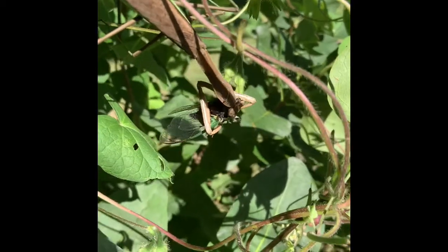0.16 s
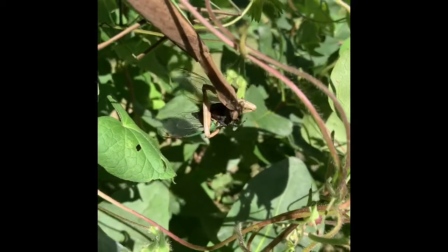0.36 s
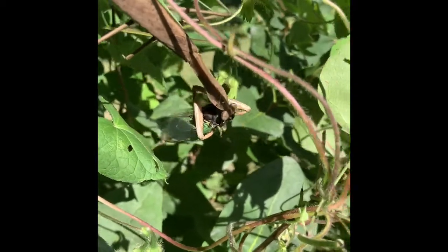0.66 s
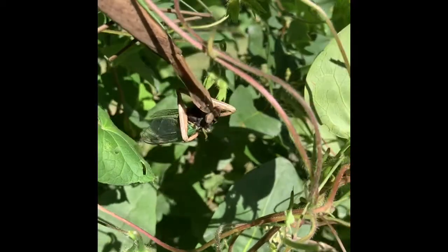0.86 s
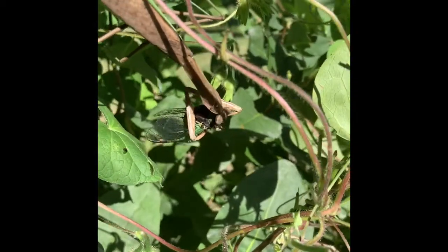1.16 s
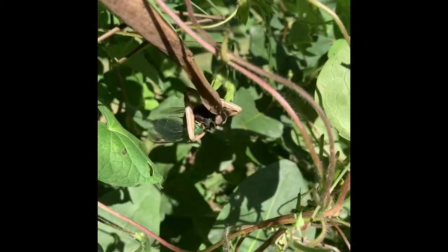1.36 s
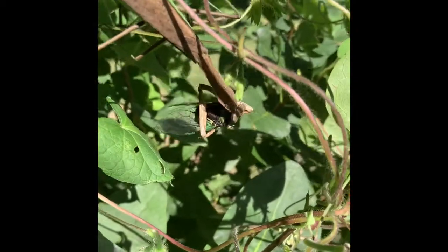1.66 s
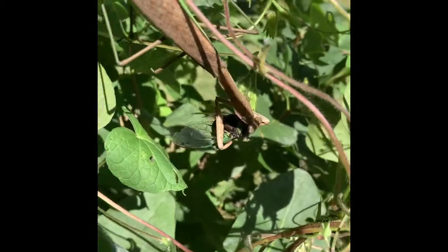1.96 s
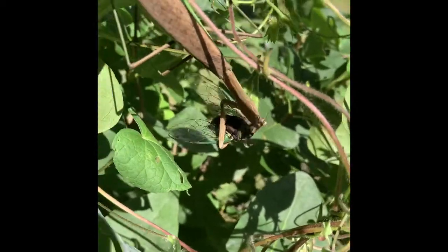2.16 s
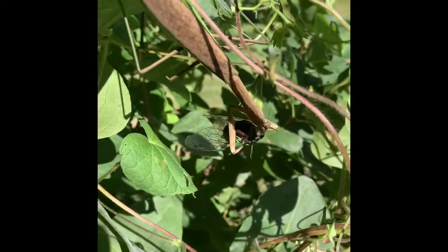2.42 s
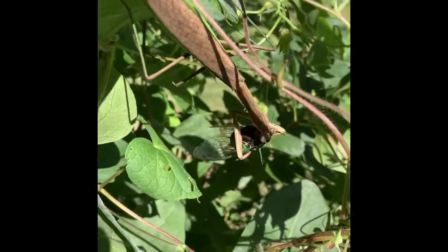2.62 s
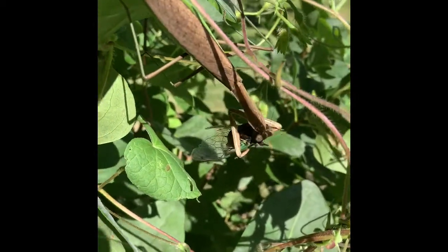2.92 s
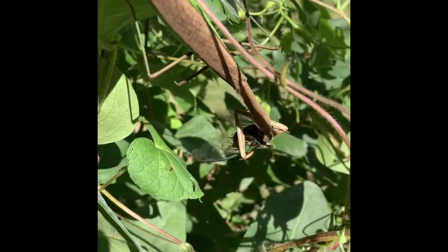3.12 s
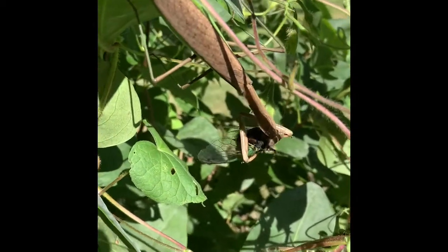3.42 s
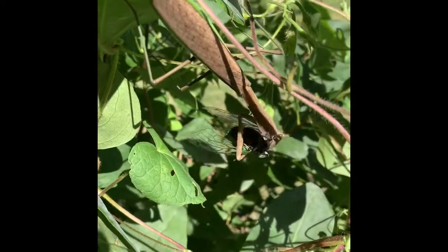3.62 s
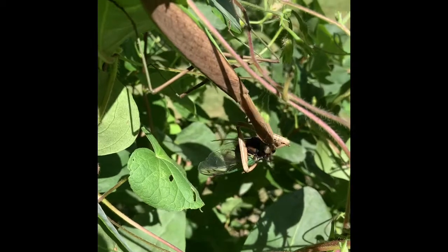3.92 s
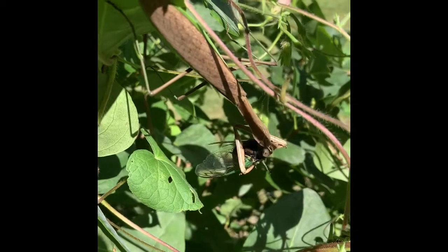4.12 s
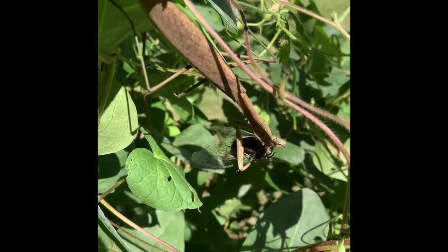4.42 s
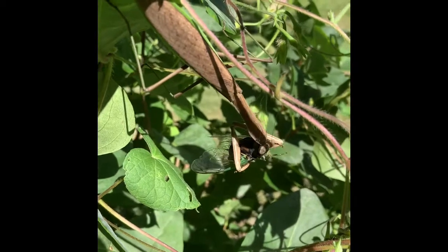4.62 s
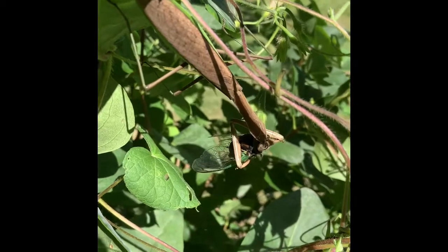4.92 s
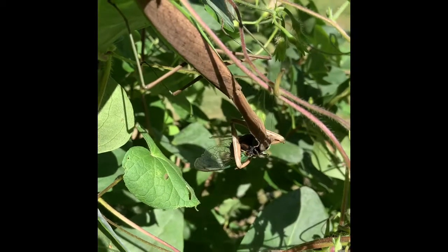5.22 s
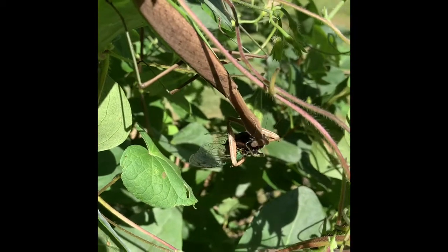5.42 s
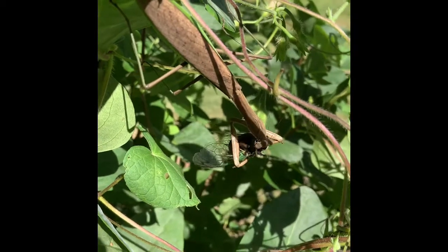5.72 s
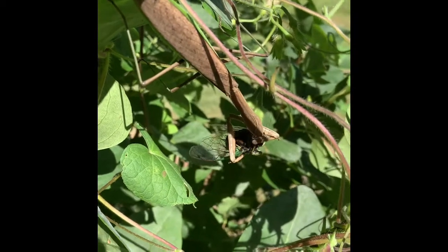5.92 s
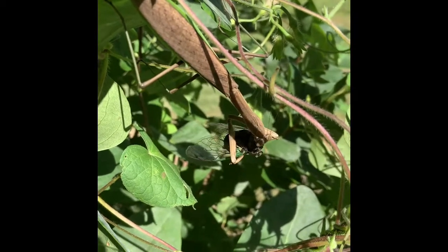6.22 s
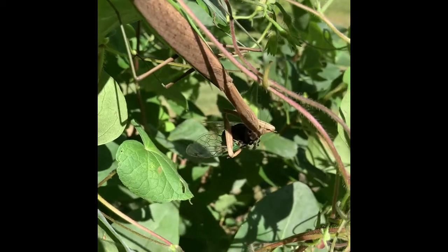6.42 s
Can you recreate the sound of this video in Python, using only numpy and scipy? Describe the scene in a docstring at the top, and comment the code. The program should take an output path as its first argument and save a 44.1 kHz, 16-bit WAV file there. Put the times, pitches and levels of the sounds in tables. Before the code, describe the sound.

Brittle wing flutters rattle among leaves in irregular groups, while far cicadas hiss, a cricket chirps rapidly and low traffic hums far away.

```python
"""A cicada held among vine leaves flaps its wings in short dry bursts close to a pair of microphones:
enveloped, crackling noise drives membrane resonances, with a soft leafy wash and a dull thud.
Around it, a far cicada chorus is a steady high hiss of noise bands, one cricket chirps a nearly pure
tone, and a katydid buzzes in long phrases of filtered ticks and rasp. Distant traffic hums in wavering
tones and rumbles in noise bands, with the coloured noise of leaves and open air."""
import sys
import numpy as np
from scipy import signal
from scipy.fft import rfft, irfft
from scipy.io import wavfile
from scipy.ndimage import uniform_filter1d

SR = 44100
rng = np.random.default_rng(int(sys.argv[2]) if len(sys.argv) > 2 else 0)


def wrap_up_sound(samples):
    """Save the sound to the file named by the first command line argument, as 16-bit audio."""
    columns = np.atleast_2d(samples).T
    # keep every value between -1 and 1, then stretch to whole-number steps
    tamed = np.clip(columns, -1, 1)
    steps = np.round(tamed * 32767).astype(np.int16)
    wavfile.write(sys.argv[1], SR, steps)


N = 289737
TIME = np.arange(N) / SR   # s
HZ = np.maximum(np.arange(N // 2 + 1) * SR / N, 1)   # frequency of each bin

# Traffic: lower and higher engine hum: t/s, lower level/dB, higher level/dB
HUM_LEVELS = [(0.0, -41.5, -65), (0.05, -41, -50), (0.16, -30, -63), (0.27, -40.5, -61), (0.4, -33, -43),
              (0.84, -40.5, -43), (0.86, -34.5, -43), (1.24, -40, -58), (1.41, -39.5, -40.5),
              (1.55, -49, -52), (2.05, -40, -38.5), (2.14, -51, -52), (2.42, -39.5, -37.5),
              (2.58, -48.5, -50.5), (2.95, -70, -34), (3.24, -60, -37.5), (3.48, -53, -52.5),
              (3.57, -66, -41.5), (4.1, -53, -49.5), (4.34, -44, -48.5), (4.48, -66, -56),
              (4.78, -50.5, -59), (5.09, -57, -51.5), (5.16, -42, -52), (5.21, -47, -68),
              (5.43, -53, -48.5), (5.84, -49, -63), (5.93, -61.5, -52), (6.4, -45, -54), (6.57, -50, -46.5)]
# Pitch of the lower hum: t/s, f/Hz
LOW_HUM_PITCH = [(0, 87.18), (1.3, 84.94), (2.5, 80.63), (4.3, 85.53), (5.7, 81.3), (6.57, 83.9)]
# Pitch of the higher hum: t/s, f/Hz
HIGH_HUM_PITCH = [(0, 98), (2.4, 96.3), (2.8, 100.5), (3.601, 102), (6.57, 103.6)]
# Harmonics of the lower hum: order, relative level/dB
LOW_HUM_HARMONICS = [(1, 0), (2, -19)]
HUM_WAVER_DB, HUM_WAVER_HZ = 1.04, 8.7
# A third, thin engine tone that comes and goes: t/s, f/Hz, level/dB
THIN_HUM_COURSE = [(3.4, 168, -70), (3.64, 167, -59), (4.13, 169, -60), (4.3, 169, -68), (5.2, 170, -65),
                   (5.5, 171, -55.5), (6.0, 171, -59.5), (6.57, 172, -57)]
# Rumble and the drone above it: t/s, rumble relative level/dB, drone relative level/dB
RUMBLE_LEVELS = [(0.0, -47, -56), (0.33, -44.5, -59), (0.8, -50, -51), (0.88, -51.5, -60.5),
                 (1.85, -53, -60.5), (2.01, -44, -53), (2.34, -46, -56.5), (2.47, -50, -57.5),
                 (4.55, -54, -66), (5.78, -52.5, -67.5), (6.37, -54.5, -61.5), (6.44, -50.5, -68.5),
                 (6.57, -56, -62)]
# Spectrum of the rumble: f/Hz, relative level/dB
RUMBLE_SPECTRUM = [(25, -19), (45, -7), (65, 6), (110, 3), (140, -1.5), (170, -5), (230, -10), (300, -22),
                   (500, -22.5), (1000, -58.5)]
# Wavering tones within the rumble: f/Hz, relative level/dB
RUMBLE_STRANDS = [(140, -6), (222, -16.5)]
DRONE_HZ, DRONE_WIDTH_HZ = 384.2, 100
# A falling tone in the drone: t/s, f/Hz
WHINE_PITCH = [(0, 362), (2.3, 342.7)]
# Middle bands: t/s, relative level/dB near 240 Hz, relative level/dB near 550 Hz
ROAR_LEVELS = [(0.0, -54.5, -76), (0.69, -67, -67), (1.1, -74, -67), (1.5, -56.5, -65), (1.88, -61, -79),
               (2.21, -56, -63), (2.78, -57, -65), (2.98, -58, -60.5), (5.84, -62, -67), (6.57, -68, -63)]

# Spectrum of the open air: f/Hz, relative level/dB
AIR_SPECTRUM = [(600, 6.5), (1000, 4), (2000, -5.5), (3500, -9.5), (8500, -13.5), (10000, -60),
                (13000, -47), (15700, -24), (15950, -48)]
AIR_START_DB, AIR_FALL_DB_PER_S = -62.5, 0.19   # the far noise recedes

# Far cicada chorus: t/s, level/dB
CHORUS_LEVELS = [(0.0, -56.5), (2.78, -59), (5.76, -60.5), (6.57, -61)]
# Noise bands of the chorus: f/Hz, width/Hz, relative level/dB
CHORUS_BANDS = [(5395, 1060, 2.5), (6854, 810, 8), (7656, 456, 2)]

CRICKET_START_S, CRICKET_PERIOD_S, CRICKET_HZ = .025, .10357, 8045
# Loudness of the cricket as it turns: t/s, relative level/dB
CRICKET_LEVELS = [(0, -62), (2.0, -62.5), (2.8, -63), (3.4, -67), (4.2, -66), (5.1, -66), (5.8, -62.5),
                  (6.57, -57.5)]

# Katydid phrases: start t/s, end t/s, stroke rate f/Hz at the start, stroke rate f/Hz at the end
KATYDID_PHRASES = [(.0667, 1.915, 65.13, 60.93), (3.2002, 4.79, 63.93, 60.56), (5.8915, 6.57, 65.54, 62.2)]
KATYDID_TICK_DB = -60   # impulse level ahead of the resonances
KATYDID_RISE_S, KATYDID_RISE_DB = .06, 13
# Soft single strokes outside the steady buzz: t/s, relative level/dB, half length/ms
KATYDID_SINGLES = [(2.486, -73, 2.5), (2.5, -65, 6), (5.307, -76, 2.25), (5.32, -65, 5), (5.897, -72, 2.5),
                   (5.912, -68, 6)]
# The two teeth struck first: delay t/ms, f/Hz, width/Hz, relative level/dB
KATYDID_TEETH = [(0, 14750, 1500, 3), (1.0, 15250, 1100, 0)]
TICK_SPREAD_DB = 4
# Wing resonances of the rasp: f/Hz, width/Hz, relative level/dB
KATYDID_RESONANCES = [(11400, 830, -10), (13850, 600, -3), (14650, 600, 3), (15150, 600, 3),
                      (15650, 350, 5)]
KATYDID_TOP_HZ = 15850

# Wing beats, mostly a slap and a back stroke, and a few faint leaf ticks: slap t/s,
# slap peak relative level/dB, dull part level/dB re the slap, back stroke delay t/ms,
# back stroke peak relative level/dB
WING_BEATS = [(0.263, -34, -10, 24, -32), (0.301, -21, -14.5, 26, -53), (0.3435, -17.5, -17, 32, -28.5),
              (0.621, -34.5, -11, 28.7, -20.5), (0.6643, -20.5, -16, 28.5, -32), (0.707, -19, -17, 34, -33),
              (0.7533, -25, -12.5, 33, -41), (1.2403, -23.5, -14.5, 22.6, -32), (1.2776, -20, -16, 26, -32),
              (1.321, -20, -18, 36, -39), (1.58, -29, -22, 27.4, -29), (1.619, -21, -13.5, 30, -29),
              (1.6634, -20.5, -16, 34, -35), (1.71, -26, -16, 33, -42.5), (2.057, -46, -20, 28, -58),
              (2.102, -35, -11, 22.6, -32.5), (2.138, -25, -7.5, 30.3, -31), (2.1804, -21, -15.5, 33, -22),
              (2.2238, -20, -21, 31, -31), (2.267, -22.5, -13.5, 36, -39), (2.6786, -27.5, -24, 28, -37),
              (2.717, -21.5, -14.5, 38, -28), (2.761, -21, -15, 39, -43), (2.916, -55, -11, 21, -76),
              (3.059, -29.5, -15.5, 29.3, -23), (3.0991, -23.5, -14, 33, -34),
              (3.1422, -22.5, -16, 41, -36), (3.1868, -24, -14, 41, -44), (3.4855, -28, -18, 29, -44),
              (3.5294, -22, -16, 31, -51), (3.571, -32.5, -36, 23, -63), (4.261, -32, -15, 29, -38),
              (4.3038, -25.5, -12, 28.3, -35), (4.3454, -22.5, -13.5, 35, -39.5),
              (4.9402, -31.5, -11.5, 27, -37), (4.9771, -24, -11.5, 33, -36),
              (5.0187, -20.5, -14.5, 39, -41.5), (5.549, -34, -10, 28.6, -37), (5.586, -23, -13.5, 33, -36),
              (5.8245, -50, -13, 32, -76), (6.0628, -42.5, -5, 28, -42), (6.1046, -33, -7.5, 29.4, -37),
              (6.146, -25.5, -10, 30, -49), (6.178, -43, -7, 21, -59)]
SLAP_T60_MS = 19.8
BACK_REFERENCE_DB = -37   # a back stroke of this peak has the swell and t60 below
BACK_SWELL_MS, BACK_T60_MS = 10.5, 50
BACK_DULL_DB = -17   # dull part re the peak, for that same stroke
BACK_DULL_PER_DB = 0.18   # the dull part gains this much for each dB of a harder stroke
BACK_HASTE_PER_DB = 1.07   # a harder stroke is shorter: dB of length lost per dB
SNAP_DB, SNAP_BEFORE_MS = 5, .8   # impulse re the drive noise; the level then holds until the peak
LEAD_DB, LEAD_T60_MS = -23, 105   # a faint rise leads up to the snap
CRACKLE_PER_S, CRACKLE_SHARE = 1000, 0.42   # just after a snap
BACK_CRACKLE_PER_S, BACK_CRACKLE_SHARE = 700, .42   # at all other times
CRACKLE_SPREAD_DB = -1.5
EVEN_OVER_MS = 4   # a stroke's strength is steady over this span, however it crackles
SNAP_ABOVE_HZ = 1400   # the membrane itself radiates little below this
DULL_BELOW_HZ = 5970
WASH_DB, WASH_WINDOW_MS = -29.5, 49
WASH_AFTER_MS, WASH_LOW_DB = 10, -3   # the wash comes late, and weaker below the dull limit
THUD_DB, THUD_BELOW_HZ = -5, 2700
THUD_FALL_MS = 24   # the thud's level falls 15 dB in this time
# Membrane modes: f/Hz, width/Hz, relative level/dB
MEMBRANE_MODES = [(2490, 230, -13), (3380, 620, -10), (3750, 790, -4), (4065, 350, -1), (4610, 210, 1.5),
                  (5240, 540, -16.5), (6170, 400, -9.5), (8600, 400, -3), (10150, 310, -5),
                  (12000, 1500, -10), (13600, 1100, 1)]
MODE_SPREAD_DB = 4
# Spectrum of the wing sound: f/Hz, relative level/dB
WING_SPECTRUM = [(500, -3.5), (1200, -9.5), (2200, -13.5), (3000, -9), (3900, -7), (4800, -10.5),
                 (7000, -14.5), (9300, -10.5), (11500, -11), (13500, -13), (15600, -11), (15950, -14),
                 (16600, -30)]

# Left-right likeness of far noise: f/Hz, likeness
FAR_LIKENESS = [(60, 0.97), (130, 1), (260, 0.88), (400, 0.84), (700, 0.031), (1300, 0.28), (1900, 0.64),
                (2500, 0.65), (3300, 0.95), (16000, .97)]
# Left-right likeness of the singing insects: f/Hz, likeness
INSECT_LIKENESS = [(4500, 0.98), (16000, 1)]
# Left-right likeness of wings among leaves: f/Hz, likeness
LEAF_LIKENESS = [(500, .75), (1500, .87), (4000, .92), (16000, .96)]
# Phase lead of the left microphone port over the right: f/Hz, phase/rad
LEFT_PHASE_LEAD = [(0, 0), (700, -.3), (1700, .3), (2500, 1.4), (3800, 1.9), (4650, 3.14), (8900, 9.42),
                   (13120, 15.7), (17000, 21.6)]
# Level of left minus right: f/Hz, level/dB
LEFT_TILT = [(200, 0), (450, -2.5), (800, -1.5), (1600, 0)]
CUTOFF_HZ = 16950


def amp(db):
    """Level to amplitude: 20 dB for each factor of ten."""
    return 10 ** (np.asarray(db) / 20)


def rms_one(x):
    """Normalisation to unit rms."""
    return x / np.sqrt(np.mean(x ** 2) + 1e-20)


def in_time(rows):
    """Linear interpolation of each column of a curve at every sample."""
    s, *columns = np.transpose(rows)
    return [np.interp(TIME, s, column) for column in columns]


def at_hz(points):
    """Interpolation of a spectrum on a logarithmic frequency axis."""
    hz, value = np.transpose(points)
    return np.interp(np.log(HZ), np.log(hz), value)


def noise():
    """Two uncorrelated white noises: the direct and the scattered part of a sound."""
    return rng.standard_normal((2, N))


def coloured(x, spectrum):
    """Spectral shaping: each frequency bin is weighted by a table."""
    return irfft(rfft(x) * amp(at_hz(spectrum)), N)


def lowpass(x, hz, order):
    """Butterworth filtering: the spectrum above the cutoff is attenuated."""
    return signal.sosfilt(signal.butter(order, hz, fs=SR, output="sos"), x)


def drift(rate_hz):
    """Slow random modulation: low-passed noise of unit rms."""
    return rms_one(lowpass(rng.standard_normal(N + SR), rate_hz, 2)[SR:])   # the onset is dropped


def resonate(x, hz, width_hz):
    """Damped resonance, passed twice for steep skirts."""
    r = np.exp(-np.pi * width_hz / SR)
    zeros = [(1 - r * r) / 2, 0, -(1 - r * r) / 2]
    poles = [1, -2 * r * np.cos(2 * np.pi * hz / SR), r * r]
    section = zeros + poles
    return signal.sosfilt([section, section], x)


def fade(x, t60_s):
    """Exponential decay: every impulse leaves a tail that falls 60 dB in t60."""
    return signal.lfilter([1], [1, -amp(-60 / (t60_s * SR))], x + 1e-18)


def spread(x, likeness):
    """Interchannel coherence: direct part alike on both sides, scattered part with opposite signs."""
    direct, scattered = rfft(x)
    alike = np.clip(at_hz(likeness), 0, 1)
    mid = direct * np.sqrt((1 + alike) / 2)
    side = scattered * np.sqrt((1 - alike) / 2)
    return irfft(np.array([mid + side, mid - side]), N)


def tone(pitch, harmonics):
    """Harmonic series on a slowly moving fundamental; order 1 at 0 dB has unit rms."""
    phase = 2 * np.pi * np.cumsum(in_time(pitch)[0] + 0.6 * drift(3.93)) / SR
    return np.sqrt(2) * sum(amp(level_db) * np.sin(k * phase) for k, level_db in harmonics)


def engine_hum():
    """Periodic radiation: far engines hum and swell in turn, with a thin third tone."""
    low_db, high_db = [db + HUM_WAVER_DB * drift(HUM_WAVER_HZ) for db in in_time(HUM_LEVELS)]
    low = amp(low_db) * tone(LOW_HUM_PITCH, LOW_HUM_HARMONICS)
    high = amp(high_db) * tone(HIGH_HUM_PITCH, [(1, 0)])
    thin_hz, thin_db = in_time(THIN_HUM_COURSE)
    onset = np.clip(TIME - THIN_HUM_COURSE[0][0], 0, .1) * 10   # enters over 0.1 s
    thin_sine = np.sqrt(2) * np.sin(2 * np.pi * np.cumsum(thin_hz) / SR)
    return low + high + amp(thin_db + 2.3 * drift(6.4)) * onset * thin_sine


def traffic():
    """Superposition of engine tones on bands of noise: rumble, drone and roar."""
    hum = engine_hum()
    rumble_db, drone_db = in_time(RUMBLE_LEVELS)
    rumble = amp(rumble_db + 4.0) * rms_one(coloured(noise(), RUMBLE_SPECTRUM))
    drone = amp(drone_db - 0.5) * rms_one(resonate(noise(), DRONE_HZ, DRONE_WIDTH_HZ))
    # very narrow noise bands are heard as wavering tones
    strands = sum(amp(rumble_db + level_db) * rms_one(resonate(rng.standard_normal(N), hz, 7.2))
                  for hz, level_db in RUMBLE_STRANDS)
    whine = rms_one(tone(WHINE_PITCH, [(1, 0)]) * drift(9.5))
    whine = whine * amp(drone_db - 5.0 + 3.9 * drift(3.2)) * (TIME < WHINE_PITCH[-1][0])
    bands = zip(in_time(ROAR_LEVELS), (240, 550), (130, 300))
    roar = sum(amp(db - 4.5) * rms_one(resonate(noise(), hz, width_hz)) for db, hz, width_hz in bands)
    tonal = (hum + strands + whine) * [[1], [0]]   # direct part only
    return roar + tonal + rumble + drone


def air():
    """Broadband noise of leaves and the far open air, falling slowly in level."""
    level_db = AIR_START_DB - AIR_FALL_DB_PER_S * TIME + 1.0 * drift(14.4)
    return amp(level_db) * rms_one(coloured(noise(), AIR_SPECTRUM))


def chorus():
    """Incoherent summation: a steady high hiss of many far singers, noise bands with random level drift."""
    hiss, white = 0, noise()
    for hz, width_hz, level_db in CHORUS_BANDS:
        for offset in np.linspace(-.8, .8, 9):
            drift_db = 2.16 * drift(60.0) + 1.2 * drift(7.9)
            band = resonate(white, hz + offset * width_hz, 0.42 * width_hz)
            hiss = hiss + rms_one(band) * amp(level_db - 20.0 * offset ** 2 + drift_db)
            white = white[::-1, ::-1]   # neighbours get unrelated noise
    return amp(in_time(CHORUS_LEVELS)[0]) * rms_one(hiss)


def cricket():
    """Amplitude modulation: a nearly pure tone in regular short chirps, each of its own strength."""
    beat = (TIME - CRICKET_START_S) / CRICKET_PERIOD_S + .5
    offset_s = (beat % 1 - .5) * CRICKET_PERIOD_S   # time from the middle of the chirp
    strength_db = 2.5 * rng.standard_normal(100)[beat.astype(int)]
    chirp = np.exp(-(offset_s / 0.016) ** 2) * amp(in_time(CRICKET_LEVELS)[0] + strength_db)
    carrier = np.sin(2 * np.pi * CRICKET_HZ * TIME + 1.2 * drift(81.0))
    return chirp * carrier * [[1.3], [.3]]   # direct, scattered


def katydid_ticks():
    """Pulse train of a stridulating file: the stroke rate slows and the onset swells in each phrase."""
    ticks = np.zeros(N)
    for start, end, first_hz, last_hz in KATYDID_PHRASES:
        on = (TIME >= start) & (TIME < end)
        turns = np.cumsum(on * np.interp(TIME, [start, end], [first_hz, last_hz])) / SR
        struck = np.diff(np.ceil(turns), prepend=0) > 0
        below_db = KATYDID_RISE_DB * np.maximum(1 - (TIME - start) / KATYDID_RISE_S, 0)
        ticks += struck * amp(KATYDID_TICK_DB - below_db)
    return ticks


def katydid():
    """Stridulation: a wing file scraped about 63 times a second excites a double tick, then a rasp."""
    ticks = katydid_ticks()
    lone = sum(amp(level_db) * np.exp(-((TIME - s) * 1000 / half_ms) ** 2)
               for s, level_db, half_ms in KATYDID_SINGLES)
    teeth = 0
    for delay_ms, hz, width_hz, level_db in KATYDID_TEETH:
        delayed = np.roll(ticks, round(delay_ms * SR / 1000))
        strength = amp(level_db + TICK_SPREAD_DB * rng.standard_normal(N))
        teeth = teeth + resonate(delayed * strength, hz, width_hz)
    # the small wing radiates no lows
    teeth = signal.sosfilt(signal.butter(4, 12800, "high", fs=SR, output="sos"), teeth)
    scrape = noise() * (amp(-3) * fade(ticks, .1) + 2 * lone)
    rasp = sum(resonate(scrape, hz, width_hz) * amp(level_db)
               for hz, width_hz, level_db in KATYDID_RESONANCES)
    effort = amp(0.66 * drift(0.33))
    song = effort * (amp(30) * teeth * [[1.3], [.3]] + amp(10.0) * rasp)   # teeth: direct, scattered
    return signal.sosfilt(signal.cheby1(8, 1, KATYDID_TOP_HZ, fs=SR, output="sos"), song)


def strokes():
    """Scaling of strokes with force, as rows: peak t/s, peak/dB, dull part/dB, swell/ms, t60/ms."""
    s, slap_db, dull_db, after_ms, back_db = np.transpose(WING_BEATS)
    harder_db = np.maximum(back_db - BACK_REFERENCE_DB, -3)
    haste = amp(-BACK_HASTE_PER_DB * harder_db)
    back_dull_db = BACK_DULL_DB + BACK_DULL_PER_DB * harder_db
    slaps = np.broadcast_arrays(s, slap_db, dull_db, 0, SLAP_T60_MS)
    backs = [s + after_ms / 1000, back_db, back_dull_db, BACK_SWELL_MS * haste, BACK_T60_MS * haste]
    return np.hstack([slaps, backs]).T


def crackle(per_s, share):
    """Random impulsive modulation: the gain jumps at chance snaps of the dry membrane."""
    strength = amp(CRACKLE_SPREAD_DB * np.minimum(rng.exponential(1, N), 2.5))
    snaps = (rng.random(N) < per_s / SR) * strength
    share = np.clip(share, 0, 1)
    return 1 - share + share * rms_one(fade(snaps, 0.00019))


def membrane_drive():
    """Impulsive and noisy excitation: quick strokes snap, slow ones swell; gives drive, bright, dull."""
    bright, dull, quick = np.zeros(N), np.zeros(N), np.zeros(N, bool)
    ms = np.arange(-600, 3000) * 1000 / SR   # time from the peak
    membrane = noise()
    for s, peak_db, dull_db, swell_ms, t60_ms in strokes():
        rise_db = -12 * (ms / max(swell_ms, .3)) ** 2
        if swell_ms < 2.5:   # quick enough to snap
            rise_db = np.where(ms < -SNAP_BEFORE_MS, LEAD_DB + 60 * ms / LEAD_T60_MS, 0)
            snap = round((s - SNAP_BEFORE_MS / 1000) * SR) + 1
            membrane[0, snap] = amp(SNAP_DB)
            quick[snap:snap + 450] = True
        shape = amp(peak_db + np.where(ms < 0, rise_db, -60 * ms / max(t60_ms, 3)))
        span = slice(round(s * SR) - 600, round(s * SR) + 3000)
        bright[span] += shape
        dull[span] += shape * amp(dull_db)
    quick_crackle = crackle(CRACKLE_PER_S, CRACKLE_SHARE)
    slow_crackle = crackle(BACK_CRACKLE_PER_S, BACK_CRACKLE_SHARE)
    membrane = membrane * np.where(quick, quick_crackle, slow_crackle)
    power = uniform_filter1d(np.mean(membrane ** 2, axis=0), round(EVEN_OVER_MS * SR / 1000))
    return membrane / np.sqrt(power + 1e-9), bright, dull


def leafy_wash(bright):
    """Energy averaging: a soft leafy wash follows the recent stroke energy over a short window."""
    window = round(WASH_WINDOW_MS * SR / 2000) * 2   # samples, even
    recent = np.abs(uniform_filter1d(bright ** 2, window, origin=window // 2 - 1))
    wash = noise() * amp(WASH_DB + 4.3 * drift(70.0)) * np.sqrt(10 * recent)
    wash = np.roll(wash, round(WASH_AFTER_MS * SR / 1000), axis=1)
    return wash - (1 - amp(WASH_LOW_DB)) * lowpass(wash, DULL_BELOW_HZ, 1)


def thud(dull):
    """Exponential energy decay: the air pushed by a stroke lingers as low noise."""
    energy = fade(dull ** 2, THUD_FALL_MS / 500)   # 30 dB of energy in twice the fall time
    linger = np.sqrt(energy * np.log(1000) * 1000 / (THUD_FALL_MS * SR))
    return amp(THUD_DB) * lowpass(noise() * linger, THUD_BELOW_HZ, 2)


def wings():
    """Modal resonance: strokes drive the wing membrane, with a leafy wash and the thud of pushed air."""
    membrane, bright, dull = membrane_drive()
    low_band = signal.butter(2, [SNAP_ABOVE_HZ, DULL_BELOW_HZ], "band", fs=SR, output="sos")
    high_band = signal.butter(4, DULL_BELOW_HZ, "high", fs=SR, output="sos")
    low = signal.sosfilt(low_band, membrane * dull)
    high = signal.sosfilt(high_band, membrane * bright)
    struck = amp(1.5) * low + high
    rings = sum(resonate(struck * amp(level_db + MODE_SPREAD_DB * drift(17.0)), hz, width_hz)
                for hz, width_hz, level_db in MEMBRANE_MODES)
    whole = struck + amp(0.5) * rings + leafy_wash(bright) + thud(dull)
    return amp(4.5) * coloured(whole, WING_SPECTRUM)


def scene():
    """Superposition of fields: directed insects, wings scattered in leaves, far noise from all round."""
    far = spread(traffic() + air(), FAR_LIKENESS)
    insects = spread(chorus() + cricket() + katydid(), INSECT_LIKENESS)
    return far + insects + spread(wings(), LEAF_LIKENESS)


def record(dry):
    """Interchannel phase and level: the right trails the left in the treble; the top is cut."""
    lag = np.interp(HZ, *np.transpose(LEFT_PHASE_LEAD)) / 2   # half to each side
    tilt = amp(at_hz(LEFT_TILT) / 2)
    wide = irfft(rfft(dry) * np.exp([1j * lag, -1j * lag]) * [tilt, 1 / tilt], N)
    return signal.sosfilt(signal.cheby2(12, 70, CUTOFF_HZ, fs=SR, output="sos"), wide)


dry = scene()
out = record(dry)
wrap_up_sound(out)
```